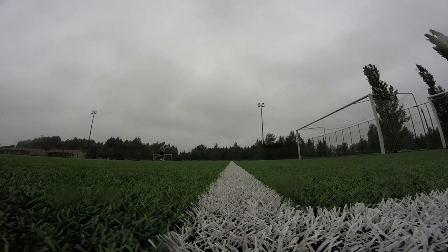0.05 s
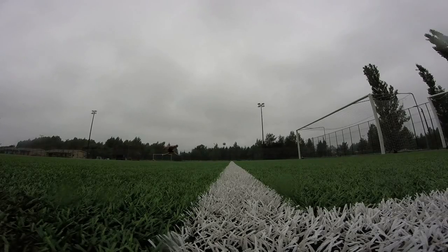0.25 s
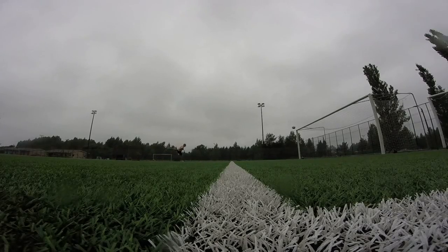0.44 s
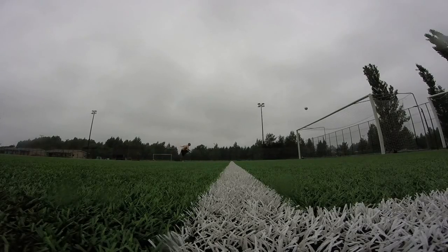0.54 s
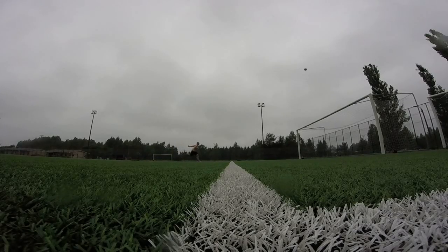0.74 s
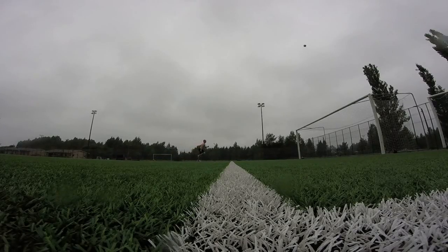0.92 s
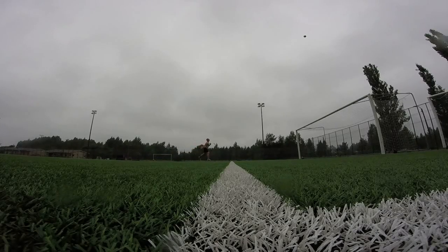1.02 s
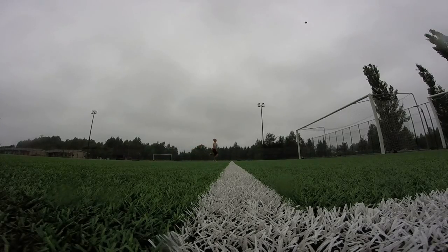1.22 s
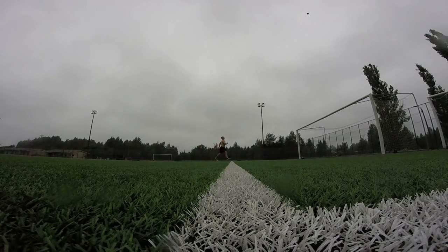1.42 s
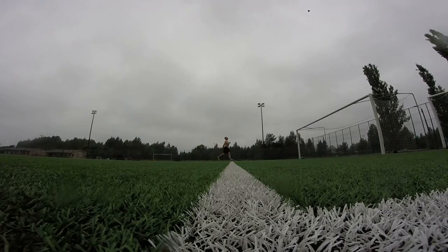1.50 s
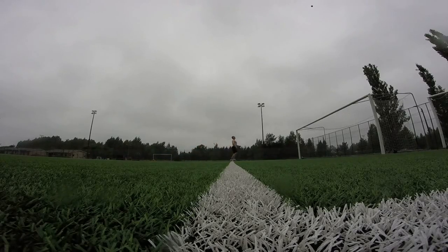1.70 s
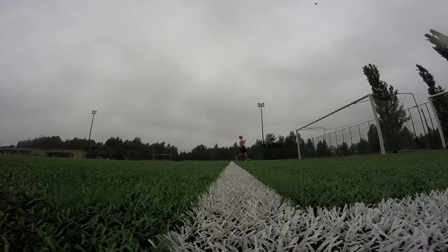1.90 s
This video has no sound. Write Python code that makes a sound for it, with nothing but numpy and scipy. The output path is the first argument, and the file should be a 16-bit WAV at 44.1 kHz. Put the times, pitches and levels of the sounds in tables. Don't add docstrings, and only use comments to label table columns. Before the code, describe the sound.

Hard kick of a ball, then a loud dull clanking hit on a goal crossbar, outdoors.

```python
import sys
import numpy as np
from scipy import signal
from scipy.fft import rfft, irfft
from scipy.io import wavfile
from scipy.ndimage import uniform_filter1d, map_coordinates

SR = 44100
rng = np.random.default_rng(int(sys.argv[2]) if len(sys.argv) > 2 else 0)


def undo_db(level):
    steps = np.asarray(level, float) / 20
    return 10 ** steps


def put_to_file(sound):
    columns = np.atleast_2d(sound).T
    safe = np.clip(columns, -1, 1)
    whole_steps = np.round(safe * 32767)
    wavfile.write(sys.argv[1], SR, whole_steps.astype(np.int16))


N = 85995


def unit(x):
    return x / np.sqrt(np.mean(x ** 2) + 1e-20)


def gain(points, hz):
    f, db = np.transpose(points)
    return undo_db(np.interp(np.log(hz + 1), np.log(f + 1), db, left=-120, right=-120))


def noise(response, size, patchy_db=0):
    z = signal.stft(rng.standard_normal(size + 1024), nperseg=512)[2]
    field = uniform_filter1d(rng.standard_normal(z.shape), size=6, axis=0)
    field = uniform_filter1d(field, size=10, axis=1)
    x = signal.istft(z * undo_db(patchy_db * unit(field)), nperseg=512)[1]
    spectrum = rfft(x) * response(np.fft.rfftfreq(len(x), 1 / SR))
    return unit(irfft(spectrum, len(x))[:size])


def since(s):
    return np.maximum(np.arange(N) / SR - s, 0)


def burst(s, db, rise, t60):
    t = since(s)
    return undo_db(db - 60 * t / t60) * (1 - np.exp(-t / rise))


def ring(s, modes, longest, spread_db=0):
    total = 0
    for hz, db, t60 in modes:
        level_db = db + spread_db * rng.normal()
        envelope = burst(s, level_db, 0.0016, min(t60, longest))
        total = total + envelope * np.sin(2 * np.pi * hz * since(s))
    return total


def thud(s, db, hz, cycles):
    u = (np.arange(N) / SR - s) * hz
    return undo_db(db) * np.exp(-.5 * (u / cycles) ** 2) * np.cos(2 * np.pi * u)


# (pitch [Hz], level [dB])
CASE = [(1350, -5), (2300, -13.5), (2910, -7), (3090, -2.5), (3530, 0), (4470, -1), (5370, -11), (6660, -3),
        (7800, -15.5), (10100, -42.5), (17200, -120)]
# (pitch [Hz], level [dB])
CASE_TOP = [(4470, -33), (7600, -15.5), (8390, 0), (9390, -8.5), (9980, -7.5), (10800, -5.5), (14400, -15),
            (15200, -38)]
CASE_WALL_HZ = 1480
TOP_DB = -13.5


def case(tilt_db):
    def response(hz):
        colour = gain(CASE, hz) + undo_db(TOP_DB) * gain(CASE_TOP, hz)
        return colour * undo_db(tilt_db * np.log2(hz / 5000 + 0.012))
    return response


# (pitch [Hz], level [dB])
RUMBLE = [(12, -40), (20, -11), (48, -3.5), (75, -4.5), (92, -3), (119, -6), (190, -8.5), (240, -20.5),
          (330, -29), (430, -58), (730, -120)]


def rumble():
    return undo_db(-48) * noise(lambda hz: gain(RUMBLE, hz), size=N, patchy_db=0.5)


# (pitch [Hz], level [dB])
TRAFFIC = [(150, -8.5), (250, -0.5), (323, -6), (396, -5), (542, -5.5), (810, -2.5), (1430, -22.5),
           (2600, -30.5), (3380, -31), (5720, -120)]
# (time [s], level [dB])
WIND = [(0, 2), (.5, 2.5), (1, 2.5), (1.4, 1.37), (1.95, 0.5)]
TRAFFIC_DB, LEAVES_DB = -45, -58.5


def traffic_and_leaves():
    wind = undo_db(np.interp(np.arange(N) / SR, *np.transpose(WIND)))
    traffic = undo_db(TRAFFIC_DB) * noise(lambda hz: gain(TRAFFIC, hz), size=N, patchy_db=1.3)
    leaves = undo_db(LEAVES_DB) * noise(case(0), size=N, patchy_db=0.5)
    return wind * (traffic + leaves)


HUM_HZ, HUM_WANDER_HZ = 71, 3
HUM_DB, HUM_SWAY_DB = -44.5, 1.5


def hum():
    sway, wander = [map_coordinates(rng.standard_normal(40), [np.arange(N) * 9 / SR]) for _ in range(2)]
    cycles = np.cumsum(HUM_HZ + HUM_WANDER_HZ * wander) / SR
    return undo_db(HUM_DB + HUM_SWAY_DB * sway) * np.sin(2 * np.pi * cycles)


# (time [s], level [dB], pitch [Hz])
STEPS = [
    (.101, -38.5, 97),
    (0.146, -27, 159),
    (0.5425, -29, 152),
    (1.19, -34, 89),
    (1.2755, -24, 142),
    (1.67, -31.5, 163),
]
STEP_CYCLES = 0.66
STEP_SCUFF_DB, STEP_SCUFF_T60, STEP_TOP_HZ = -1.5, 0.041, 453


def steps():
    scuff = undo_db(STEP_SCUFF_DB) * noise(lambda hz: hz / (80 + hz) / (1 + (hz / STEP_TOP_HZ) ** 4), size=N)
    total = 0
    for s, db, hz in STEPS:
        touch_s = s - 0.74 / hz
        total = total + thud(s, db, hz, STEP_CYCLES) + burst(touch_s, db, 0.00087, STEP_SCUFF_T60) * scuff
    return total


# (start [s], end [s], level [dB])
ECHOES = [
    (0.749, 0.828, -38),
    (0.902, 1.099, -37),
]
ECHOES_PER_S, ECHO_SCATTER_DB = 270, 11.5
ECHO_WIDTH_S = 0.00059


def echoes():
    arrivals = np.zeros(N)
    for start, end, db in ECHOES:
        count = int((end - start) * ECHOES_PER_S) + 1
        when, side, strength = rng.random((64, 3))[:count].T
        index = (SR * (start + (end - start) * when)).astype(int)
        level = undo_db(db + ECHO_SCATTER_DB * np.log(strength + 0.011))
        np.add.at(arrivals, index, np.sign(side - .5) * level)
    t = np.arange(-200, 200) / SR / ECHO_WIDTH_S
    pulse = (1 - t * t) * np.exp(-.5 * t * t)
    return np.convolve(arrivals, pulse, "same")


# (time [s], level [dB], pitch [Hz], spread [cycles])
RETURNS = [(0.6405, -31, 650, 0.5), (0.6436, -24.5, 110, 0.65), (0.644, -25.5, 237, 1.23),
           (0.6465, -21.5, 530, 0.88), (0.6516, -19, 691, 0.45), (0.6555, -33, 781, 1.1),
           (0.6581, -26, 205, 0.65), (0.6593, -22.4, 595, 1), (0.6633, -24.1, 850, 1.1),
           (0.6636, -22, 390, 0.65), (0.6687, -24.5, 660, 0.83), (0.6722, -30.0, 423, 1),
           (0.6751, -44, 686, 2.4), (0.6786, -30.0, 216, 1.2), (0.68, -38, 117, 0.44),
           (0.6854, -26, 487, 0.82), (0.6887, -33, 620, 0.26), (0.694, -22, 423, 0.42),
           (0.697, -29, 139, 0.43), (0.6984, -22, 695, 0.32), (0.705, -23, 686, 0.37),
           (0.7112, -23.5, 406, 1.5), (0.7128, -24, 570, 0.91), (0.7184, -30, 656, 1.2),
           (0.722, -30, 352, 0.39), (0.7285, -30, 509, 0.42), (0.7305, -26.5, 134, 0.48),
           (0.738, -29, 939, 1.9), (0.7405, -27, 293, 0.65), (0.749, -28, 257, 0.65),
           (0.7676, -26, 398, 0.42), (0.7725, -32.5, 398, 0.37), (0.7782, -23, 426, 0.34),
           (0.7883, -30.5, 575, 0.91), (0.7914, -29, 203, 0.53), (0.8207, -39, 436, 2.4),
           (0.8353, -26.5, 244, 0.55), (0.8368, -43, 454, 2.4), (0.8487, -36, 261, 1.6),
           (0.8512, -34, 735, 2), (0.8535, -32, 463, 2.1), (0.8654, -27, 216, 0.42),
           (0.872, -24, 696, 0.34), (0.876, -27.5, 169, 0.8), (0.8812, -34, 612, 1),
           (0.8917, -37, 166, 0.67), (0.9084, -35, 470, 1.8), (0.9339, -38, 148, 1)]


def returns():
    return sum(np.sign(rng.normal()) * thud(*row) for row in RETURNS)


POST_S, POST_DB, POST_RISE_S, POST_T60 = .79, -24, .06, .33
POST_HZ, POST_CLIMB_HZ_PER_S = 410, 1050


def post():
    t = since(POST_S)
    cycles = (POST_HZ + POST_CLIMB_HZ_PER_S * t / 2) * t
    return burst(POST_S, POST_DB, POST_RISE_S, POST_T60) * np.sin(2 * np.pi * cycles)


# (time [s], level [dB], rise [s], t60 [s])
SHUDDER = [
    (0.23, -31, .002, 0.22),
    (0.636, -26, 0.0025, 0.17),
    (0.65, -21.5, 0.008, 0.33),
    (0.697, -29, 0.0046, 0.72),
    (.76, -36.5, .01, 0.36),
    (0.827, -23.5, 0.01, 0.29),
    (.855, -36.5, 0.0063, 0.6),
    (1.252, -40, .002, 0.11),
]
# (pitch [Hz], level [dB])
TAIL = [(29, -36), (50, -5.5), (215, -0.5), (257, -6), (445, -2.5), (879, -4.5), (1260, -21.5), (2070, -26),
        (2400, -40), (3120, -73), (5280, -120)]
SHUDDER_TRIM_DB = -4


def shudder():
    total = 0
    for row in SHUDDER:
        trim = undo_db(SHUDDER_TRIM_DB * (.63 < row[0] < .9))
        total = total + burst(*row) * trim * noise(lambda hz: gain(TAIL, hz), size=N, patchy_db=1.0)
    return total


# (time [s], level [dB], rise [s], t60 [s])
GRAZES = [
    (0.1338, -25.5, 0.0012, 0.019),
    (0.6104, -16.5, 0.0038, 0.11),
    (0.6316, -22.5, .001, .03),
    (1.094, -38, .0005, 0.016),
]
GRAZE_HZ = 790


def grazes():
    return sum(burst(*row) * noise(lambda hz: hz / (1 + (hz / GRAZE_HZ) ** 8), size=N) for row in GRAZES)


# (time [s], level [dB], rise [s], t60 [s], tilt [dB per octave])
CRACKS = [(.236, -54, .001, .04, 18), (0.611, -29, 0.0029, 0.12, -10), (0.613, -38, 0.0016, 0.089, 26),
          (0.619, -41, 0.001, 0.12, -1), (0.628, -36, 0.0032, 0.13, 3.5), (0.636, -36.5, 0.0013, 0.049, -5),
          (0.645, -42, 0.0027, 0.32, -1), (0.691, -43.5, 0.007, 0.5, -1), (0.726, -41, 0.0023, 0.17, -1),
          (0.731, -38, 0.0017, 0.084, 11), (.76, -74, .003, 0.51, -8), (.827, -44, .0009, 0.067, -6),
          (.843, -51.5, .001, .06, 10), (.85, -53.5, 0.0048, 0.81, -3.5)]


def cracks():
    return sum(burst(*row[:4]) * noise(case(row[4]), size=N, patchy_db=-1) for row in CRACKS)


# (pitch [Hz], level [dB], t60 [s])
CLIP = [(6476, -12, .16), (6830, -5, .35), (6912, -3, .5), (7050, -8, .3), (7139, 0, .4), (7278, -5, .15),
        (7359, -8, .25)]
CLIP_TAPS = [
    (0.73, -62),
    (0.736, -45.5),
    (0.746, -61),
    (0.771, -52),
]


def clip():
    return sum(undo_db(db) * ring(s, CLIP, 1, spread_db=1.5) for s, db in CLIP_TAPS)


# (pitch [Hz], level [dB], t60 [s])
CLANG = [(1970, -35.5, 0.079), (2040, -36, 0.079), (2777, -34.5, 0.059), (3244, -43, 0.066),
         (3450, -38, .06), (3440, -30, 0.046), (3500, -44, 0.039), (4470, -39, .05), (6430, -37, 0.034),
         (6850, -46, .11)]
# (pitch [Hz], level [dB], t60 [s])
FRAME = [(216, 9, 0.3), (404, -19, 2.3), (561, 6.5, 5.0), (730, -13, 0.21), (854, 1, 0.29),
         (4400, -33, 5.0), (5940, -18, 0.15), (7180, -21, 0.59)]
FRAME_DB, FRAME_LONGEST_S = -31.5, .16


def crossbar():
    hit_s = CONTACTS[1][0]
    return ring(hit_s - .008, CLANG, 1) + undo_db(FRAME_DB) * ring(hit_s, FRAME, FRAME_LONGEST_S)


TICK_S = [.2137, .217, .2198, .2339, .2383, .2408, .6208, .6209, .6368, .6815, .7043, .8425, .8427]
# (level [dB], centre [Hz], width [octaves])
TICKS = [(-42, 9500, 0.26), (-34, 7600, .9), (-40, 9200, 0.14), (-35.5, 9000, 0.18), (-33.5, 7500, .9),
         (-42, 10500, .23), (-16.5, 3340, 0.45), (-17, 7140, 0.27), (-24, 3280, 0.2), (-40, 2900, 0.36),
         (-36, 5800, 0.67), (-34, 3200, 0.27), (-36, 6400, 0.11)]
TICK_SMEAR_DB, TICK_SMEAR_S = -16, .0022


def ticks():
    out, hz = np.zeros(N + 2048), np.fft.rfftfreq(2048, 1 / SR)
    fold = np.r_[1, np.full(1023, 2), 1, np.zeros(1023)]
    age = np.arange(255) / SR
    for s, (db, centre_hz, octaves) in zip(TICK_S, TICKS):
        colour = case(1.5)(hz) * np.exp(-.5 * (np.log2(hz / centre_hz + .001) / octaves) ** 2)
        cepstrum = irfft(np.log(colour / colour.max() + 1e-3))
        pulse = irfft(np.exp(rfft(cepstrum * fold)))
        smear = rng.standard_normal(255) * undo_db(TICK_SMEAR_DB - 60 * age / TICK_SMEAR_S)
        pulse = np.convolve(pulse, np.r_[1, smear])[:2048]
        out[round(s * SR):][:2048] += undo_db(db) * pulse / np.abs(pulse).max()
    return out[:N]


# (time [s], push + or pull - [amplitude], pitch [Hz])
BUCKLES = [(.1338, .07, 750), (.2317, .09, 500), (.2359, .3, 800), (.2366, -.2, 800), (.2433, -.35, 800),
           (.6212, .2, 1200), (.6277, .1, 600), (.629, -.2, 700), (.6327, .2, 900), (.6352, -.17, 500),
           (1.0965, .035, 800)]
BUCKLE_CYCLES = .35


def buckles():
    pushes = sum(size * thud(s, 0, hz, BUCKLE_CYCLES) for s, size, hz in BUCKLES)
    return signal.sosfiltfilt(signal.butter(6, CASE_WALL_HZ, fs=SR, output="sos"), pushes)


# (time [s], peak level [dB], contact [s], slap width [s], release level [dB])
CONTACTS = [
    (.2345, -.5, .0107, .00033, -11),
    (.6211, -2.5, .0111, .0008, -3),
]
# (slap level [dB], slap rise over fall [ratio], swing bend [power],
# air ring level [dB])
SQUASH = [
    (0, 1, 0.98, -1),
    (-1.5, 0.12, 0.89, -21),
]
# (pitch [Hz], level [dB], t60 [s])
BALL = [(105, -6, 0.028), (268, -14.5, 0.046), (504, -19.5, 0.066), (607, -7.5, 0.024), (693, -22, 0.045),
        (848, -18.5, 0.042), (980, -22, 0.023), (1100, -41, 0.034), (1210, -41, 0.05)]
SQUASH_LAG_S, SQUASH_FADE_DB, LEAVE_DB, FREE_FADE_DB = 0.00059, 3.5, 6, 23
AIR_LEAD_S = 0.00037
SNAP_WIDTH_S, MIC_LOW_HZ = 0.00026, 35


def ball():
    t, out = np.arange(N) / SR, 0
    wall = signal.butter(10, CASE_WALL_HZ, fs=SR, output="sos")
    mic = signal.butter(1, MIC_LOW_HZ, "high", fs=SR, output="sos")
    for (s, db, contact, width, release_db), (slap_db, rise, bend, air_db) in zip(CONTACTS, SQUASH):
        u = since(s + SQUASH_LAG_S) / (contact - 2 * SQUASH_LAG_S)
        free_db = np.where(u > 1, LEAVE_DB + FREE_FADE_DB * (u - 1), 0)
        squash = -np.sin(2 * np.pi * u ** bend) * undo_db(-SQUASH_FADE_DB * u - free_db)
        slap_width = np.where(t < s, rise * width, width)
        slap = undo_db(slap_db) * np.exp(-.5 * ((t - s) / slap_width) ** 2)
        snap = -undo_db(release_db) * np.exp(-.5 * ((t - s - contact) / SNAP_WIDTH_S) ** 2)
        inside = ring(s - AIR_LEAD_S, BALL, 1) + 0.2 * ring(s + contact, BALL, 1)
        hit = squash + slap + snap + undo_db(air_db) * inside
        hit = signal.sosfilt(mic, signal.sosfiltfilt(wall, hit))
        out = out + undo_db(db) * hit / np.abs(hit).max()
    return out


def scene():
    background = rumble() + traffic_and_leaves() + hum() + steps()
    reflections = echoes() + returns()
    goal = post() + shudder() + grazes() + cracks() + clip() + crossbar()
    return (background + reflections + goal + ticks() + buckles() + ball())[None]


def low_pass(x):
    return signal.sosfilt(signal.butter(12, 15800, fs=SR, output="sos"), x)


CEILING, KNEE, TOP_HZ = .97, 40, 15800


def record(dry):
    held = dry / (1 + np.abs(dry / CEILING) ** KNEE) ** (1 / KNEE)
    in_band = np.fft.rfftfreq(N, 1 / SR) < TOP_HZ
    mix = irfft(rfft(held) * in_band, N)
    return low_pass(mix)


dry = scene()
out = record(dry)
put_to_file(out)
```